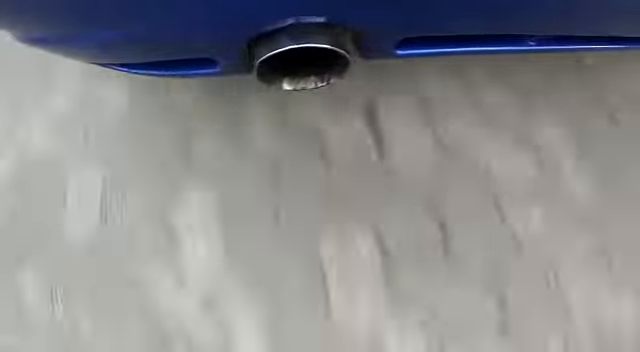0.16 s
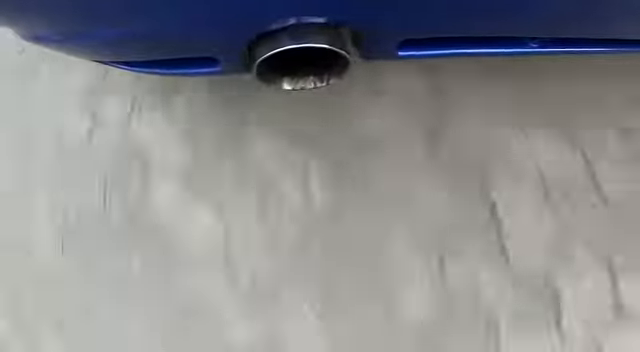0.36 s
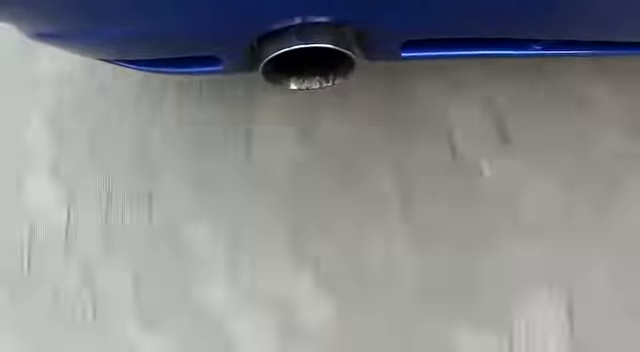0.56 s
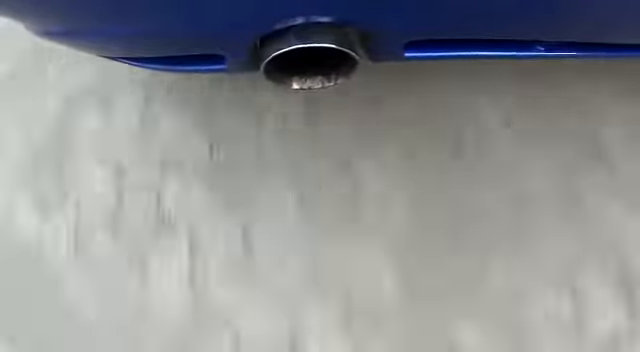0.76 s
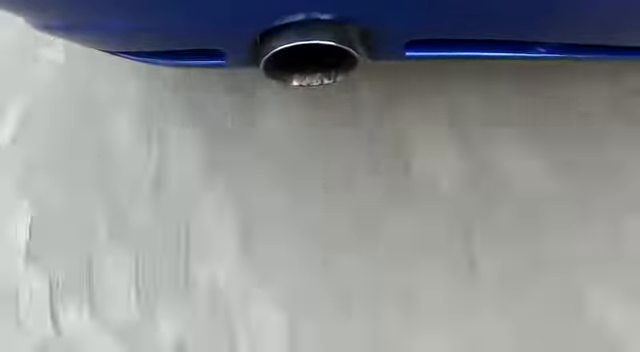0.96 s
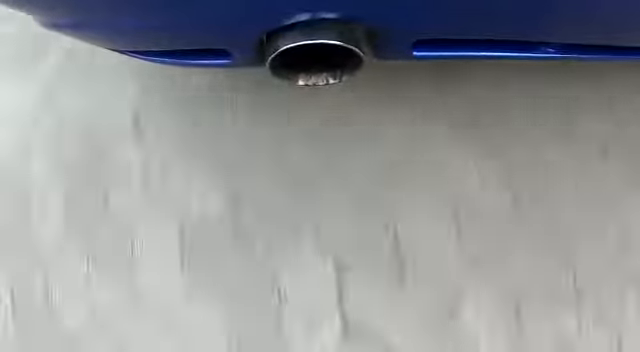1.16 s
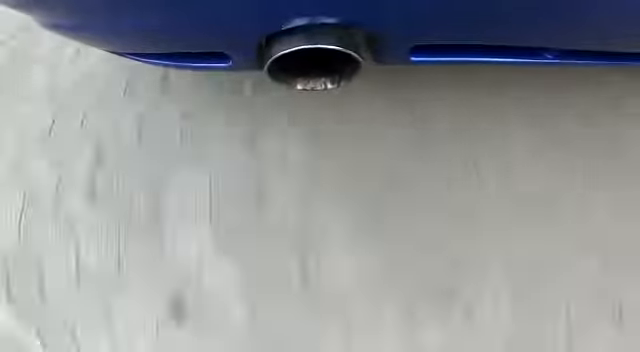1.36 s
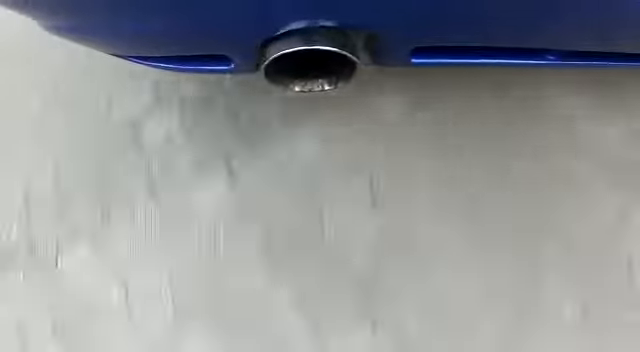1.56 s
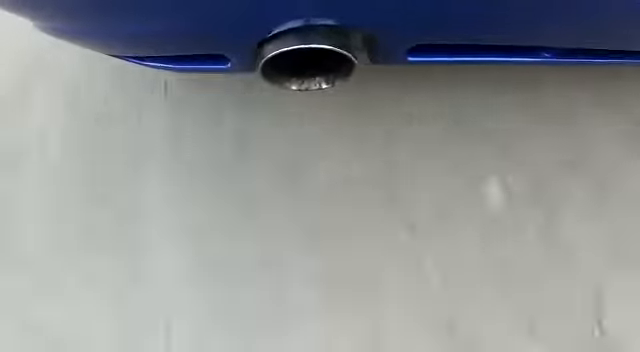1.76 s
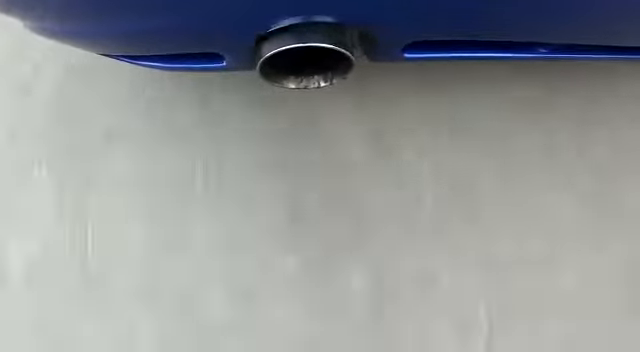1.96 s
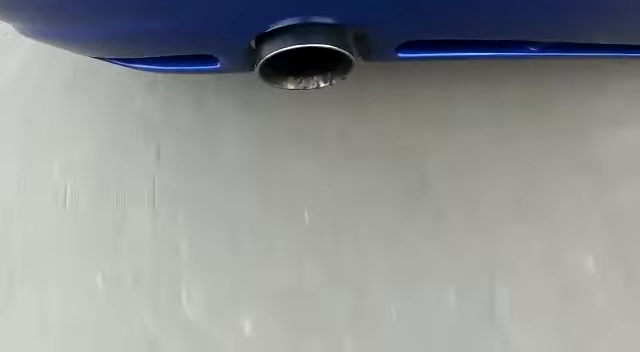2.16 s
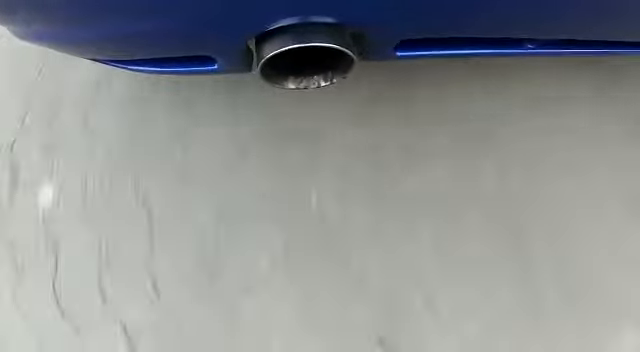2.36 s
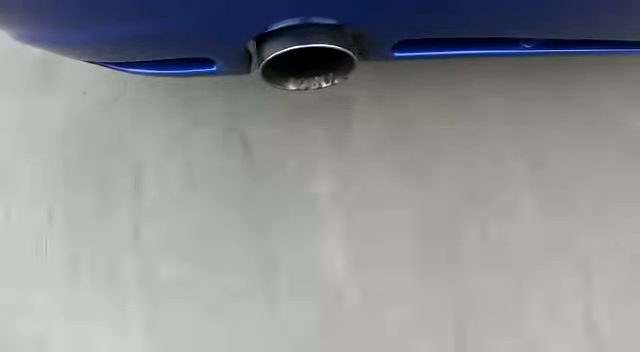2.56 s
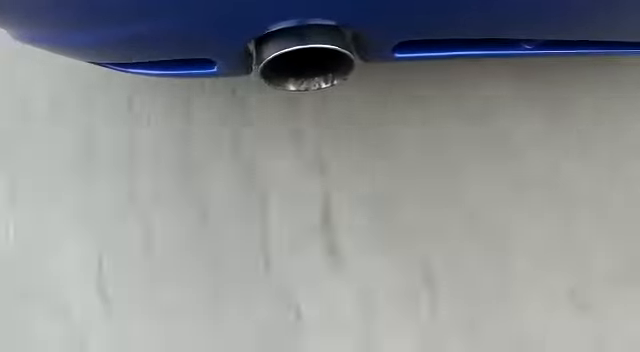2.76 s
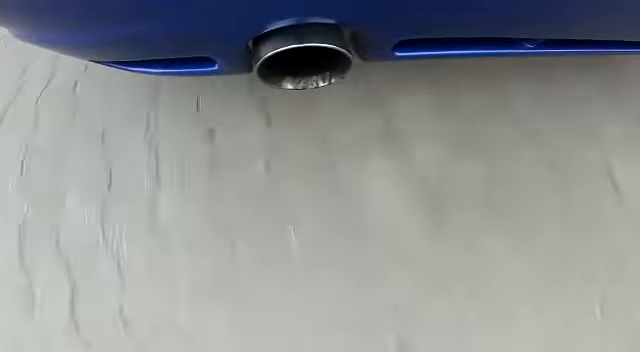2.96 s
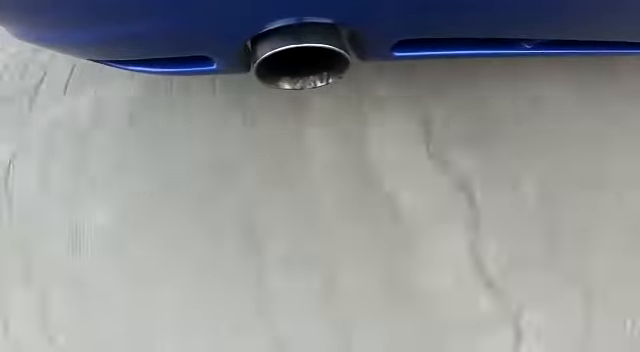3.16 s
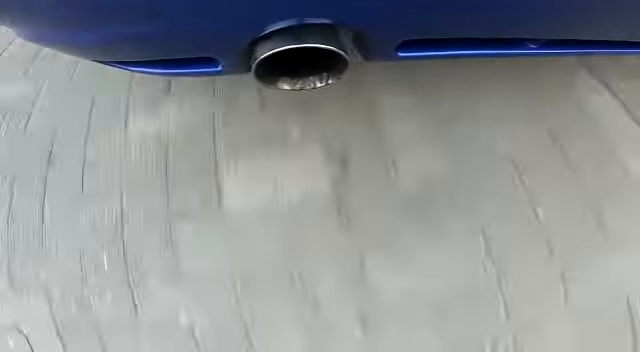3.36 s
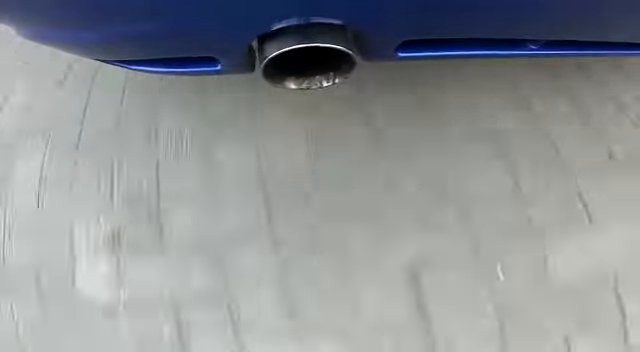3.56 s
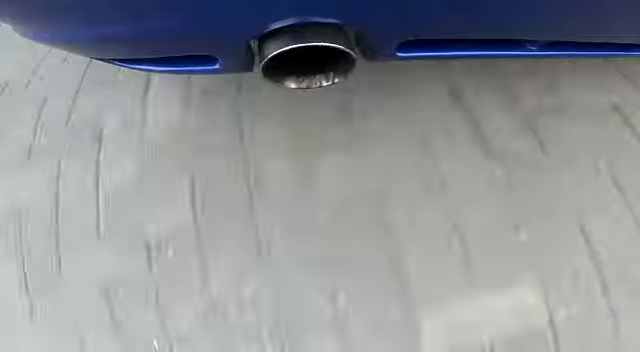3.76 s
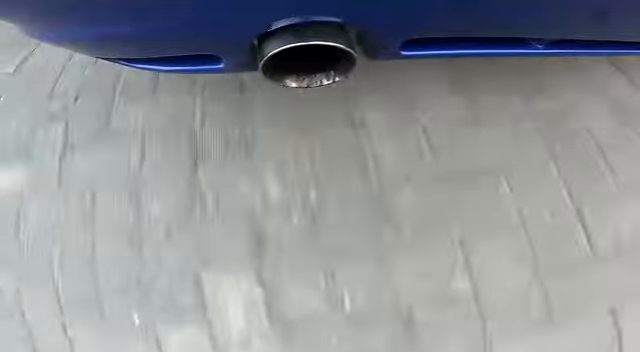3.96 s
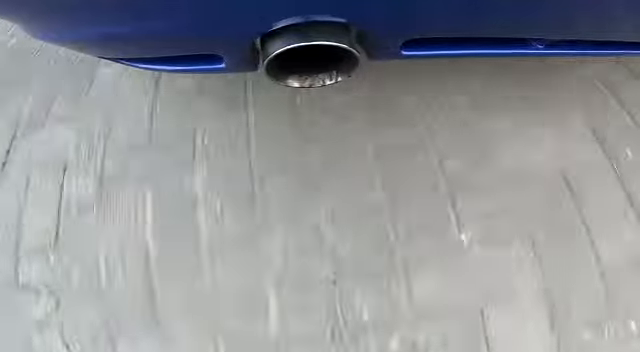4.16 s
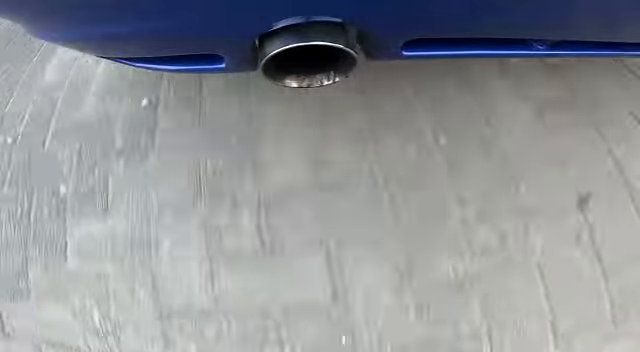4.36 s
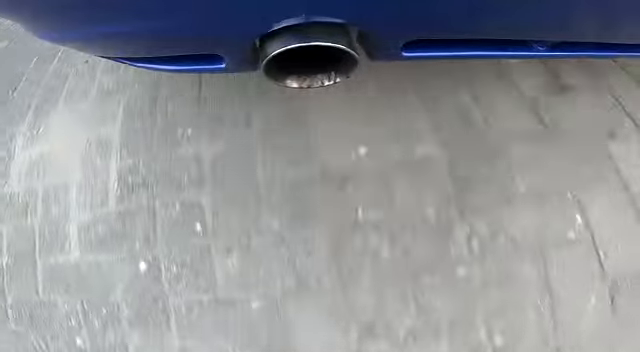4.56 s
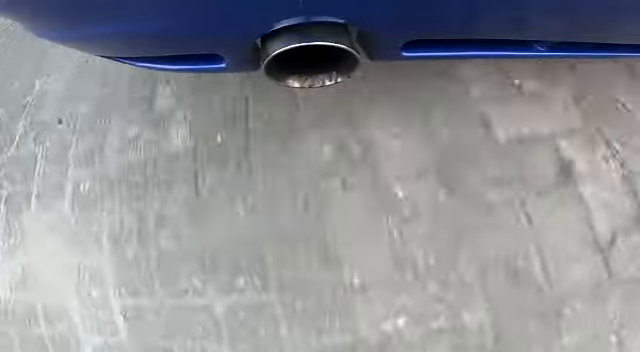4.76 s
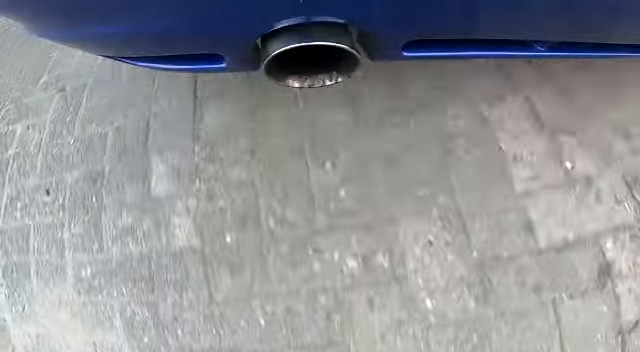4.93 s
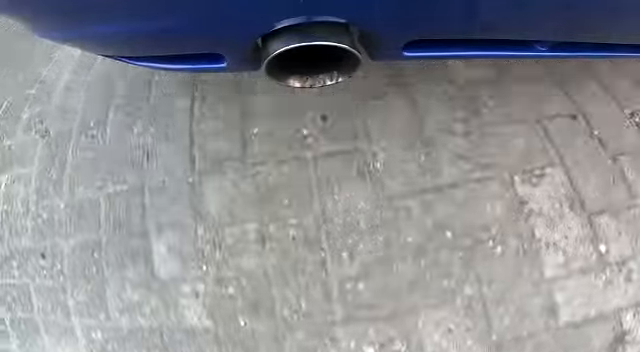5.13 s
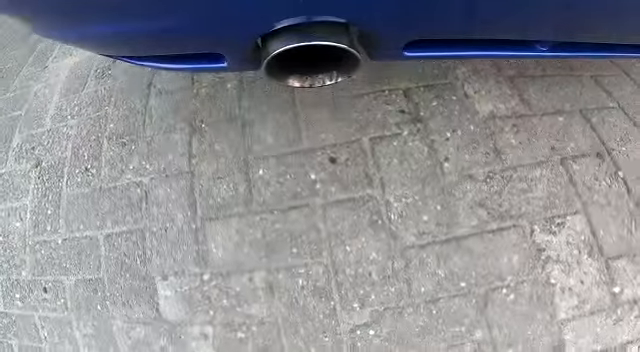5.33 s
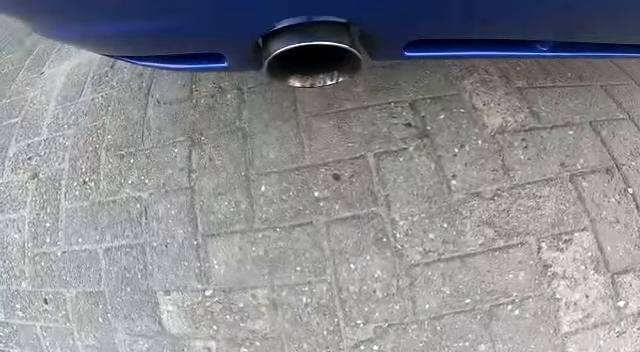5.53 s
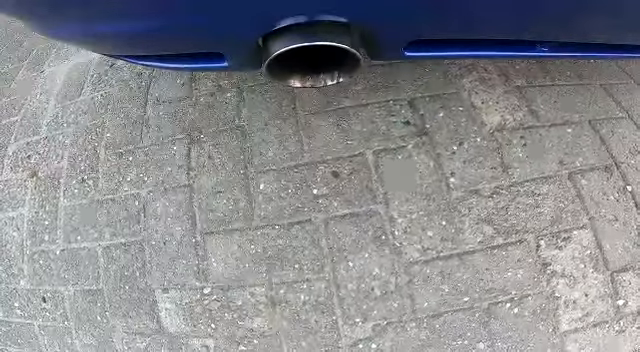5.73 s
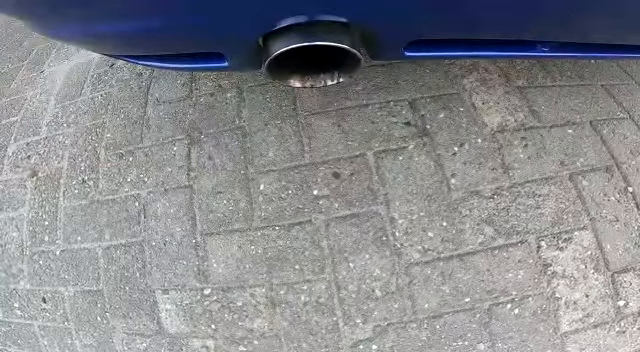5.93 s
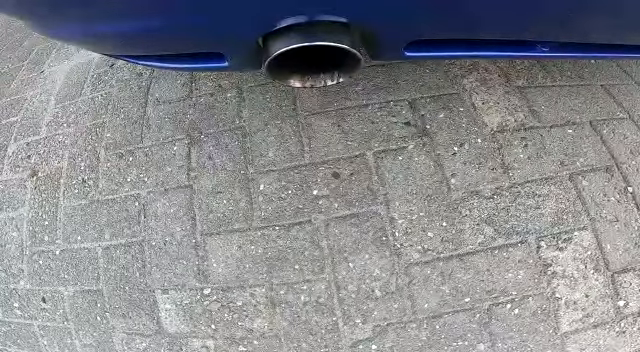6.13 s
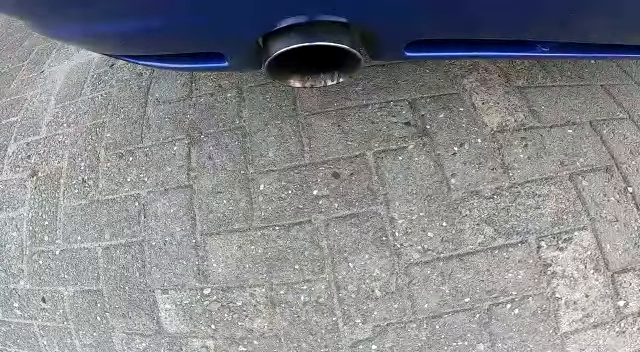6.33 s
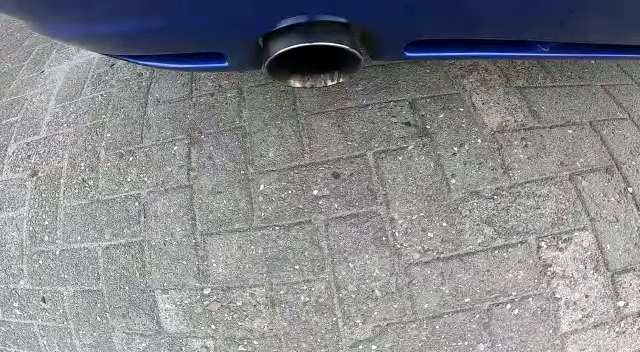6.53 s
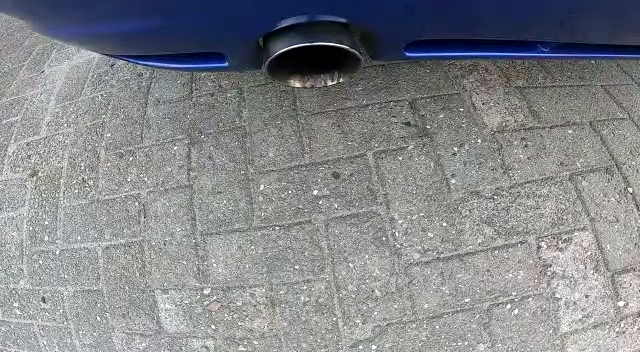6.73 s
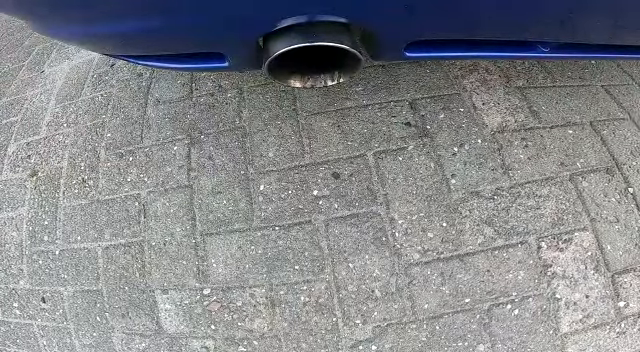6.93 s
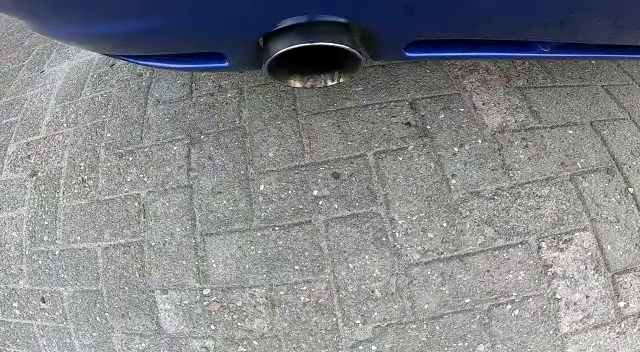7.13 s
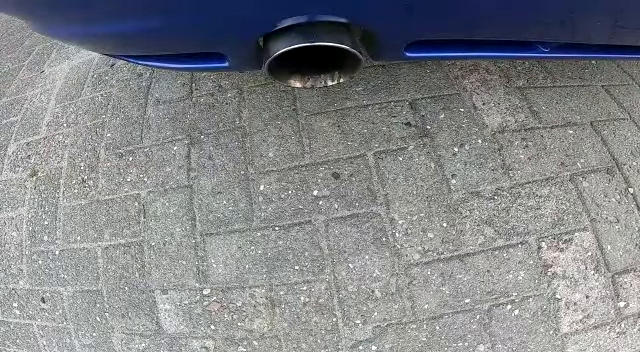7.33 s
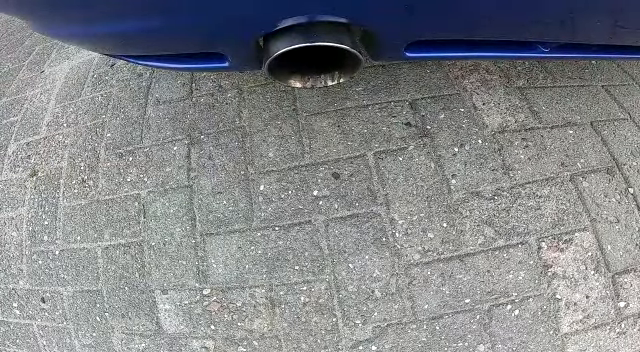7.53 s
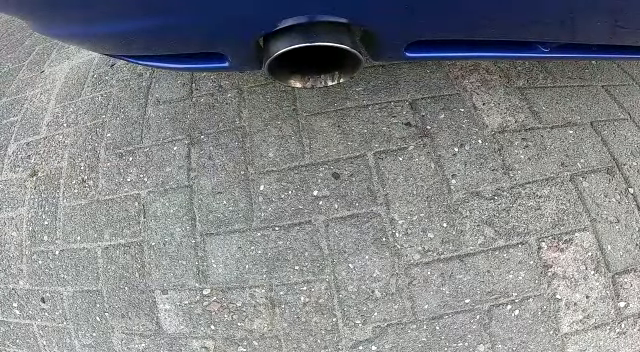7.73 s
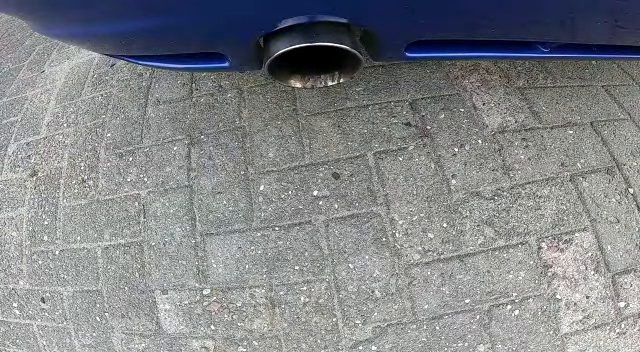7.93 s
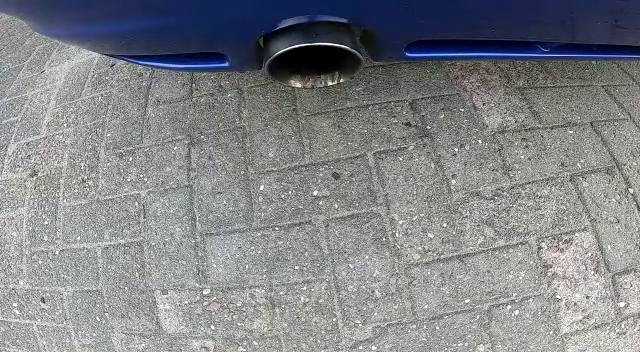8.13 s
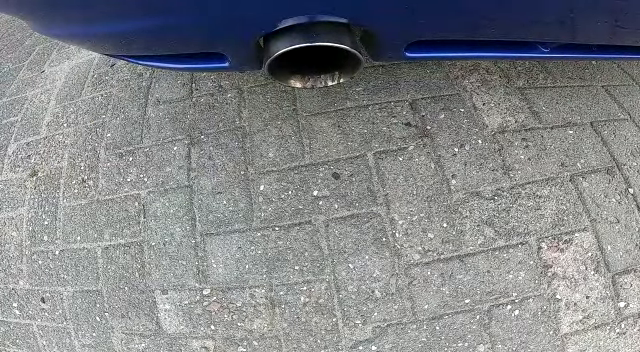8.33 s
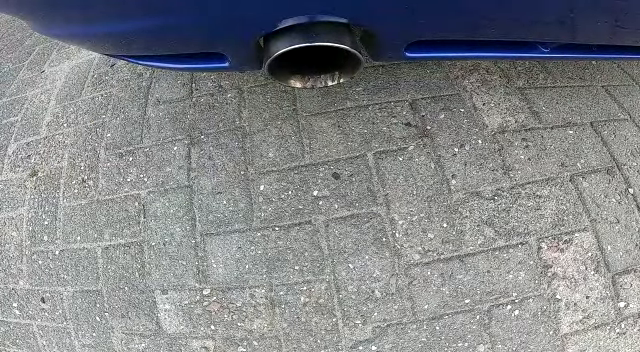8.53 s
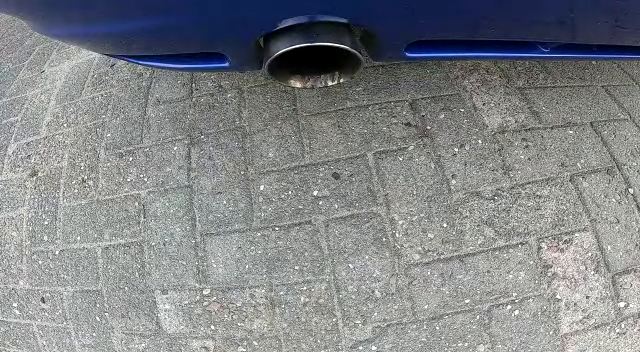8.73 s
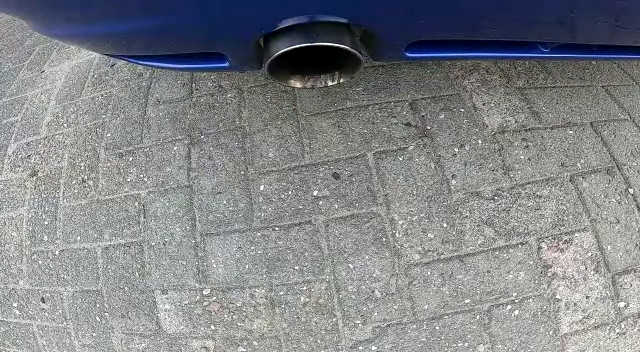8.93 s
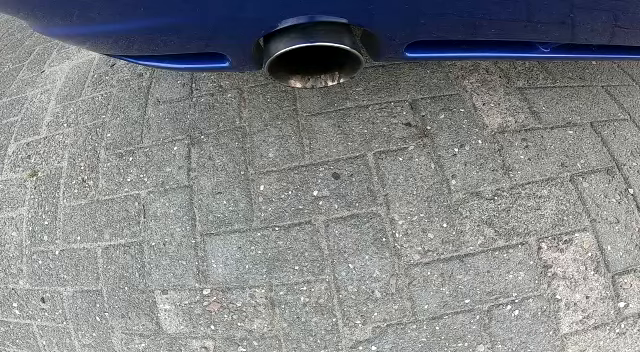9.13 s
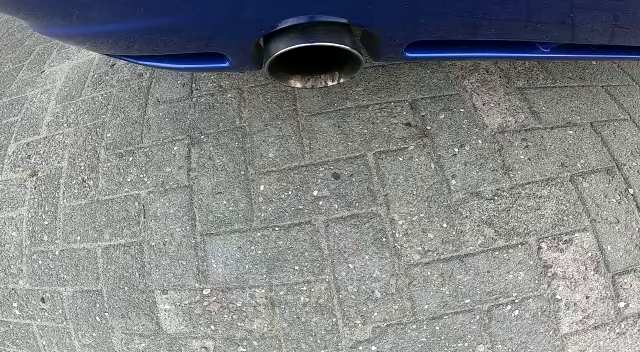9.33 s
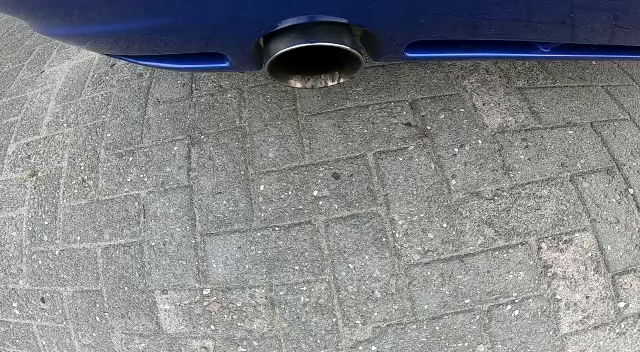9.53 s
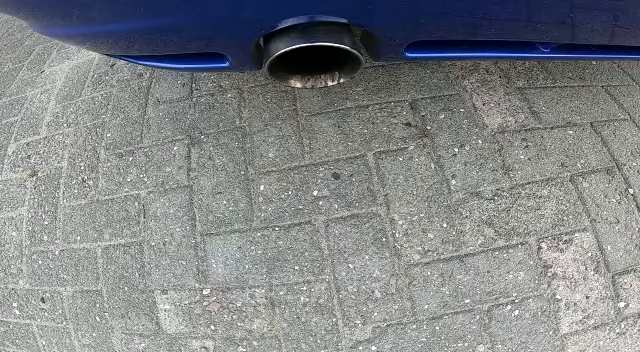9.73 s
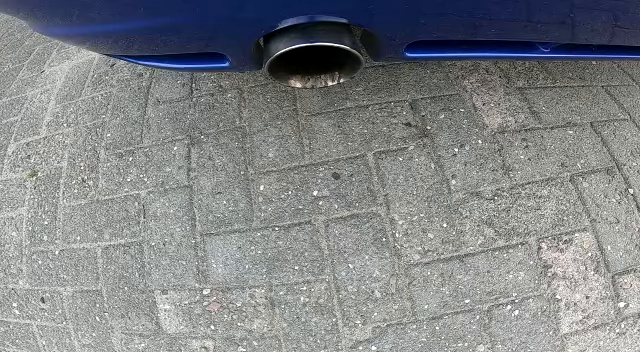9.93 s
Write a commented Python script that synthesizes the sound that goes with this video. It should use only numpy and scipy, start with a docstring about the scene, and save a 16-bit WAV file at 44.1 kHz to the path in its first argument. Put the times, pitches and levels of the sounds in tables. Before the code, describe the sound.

A deep, throbbing car exhaust sounds very close, dipping and swelling once as the car cruises over paving bricks, its tyres hissing faintly. The engine burbles down in pitch, then idles with an uneven, chuffing beat while trim ticks quietly. Finally the ignition is cut: the last strokes puff out and the engine rocks to a stop with a few dull knocks.

```python
"""A six-cylinder car's exhaust, heard just above the tailpipe: it cruises, coasts down, idles and is
switched off. Engine speed and throttle drive uneven firing pulses, which ring the silencer and pipe
and make the idle lope. Tyres hiss and snap grit on a brick street, and loose trim ticks.
With the ignition off, the last strokes puff out and the engine rocks in its mounts."""
import sys
import numpy as np
from scipy import signal
from scipy.fft import rfft, irfft
from scipy.io import wavfile
from scipy.ndimage import uniform_filter1d, map_coordinates

SR = 44100
rng = np.random.default_rng(int(sys.argv[2]) if len(sys.argv) > 2 else 0)


def transcribe(u):
    """Save the signal u as a 16-bit wav file named by the first command-line argument.

    u: samples, shape (n,) or (channels, n), limited to [-1, 1]; the rate is SR.
    q: integer samples, one column per channel.
    """
    v = np.clip(np.atleast_2d(u).T, -1, 1)
    q = np.round(v * 32767).astype(np.int16)
    wavfile.write(sys.argv[1], SR, q)


N = 440559


def amp(db):
    """Decibels to gain."""
    return 10 ** (np.asarray(db) / 20)


def unit(x):
    """Scale to rms 1."""
    return x / np.sqrt(np.mean(x ** 2) + 1e-20)


def steady(x):
    """Hold the rms at 1 over about two idling engine cycles."""
    return x / np.sqrt(np.abs(uniform_filter1d(x ** 2, size=15200)) + 1e-14)


def curve(rows):
    """Interpolate (seconds, value) rows to one value per sample."""
    return np.interp(np.arange(N) / SR, *np.transpose(rows))


def swells(rows):
    """Sum of bell-shaped level changes in dB, one value per sample."""
    t = np.arange(N) / SR
    return sum(db * np.exp(-((t - s) / width_s) ** 2) for s, width_s, db in rows)


def wobble(knots_per_s):
    """A smooth random curve, rms about 1."""
    knots = rng.standard_normal(int(N * knots_per_s / SR) + 4)
    return map_coordinates(knots, [np.arange(N) * knots_per_s / SR])


def colour(x, points, size=16384):
    """Minimum-phase filter with the gain of the (Hz, dB) points."""
    hz, db = np.transpose(points)
    gain = amp(np.interp(np.log(np.fft.rfftfreq(size, 1 / SR) + 1), np.log(hz), db))
    cepstrum = irfft(np.log(gain + 1e-6))
    cepstrum[1:size // 2] *= 2
    cepstrum[size // 2 + 1:] = 0
    return signal.fftconvolve(x, irfft(np.exp(rfft(cepstrum))))[:len(x)]


def butter(x, hz, kind, order=2):
    """Causal low- or high-pass."""
    return signal.sosfilt(signal.butter(order, hz, kind, fs=SR, output="sos"), x)


def resonate(x, hz, q):
    """One resonant mode."""
    return signal.lfilter(*signal.iirpeak(hz, q, SR), x)


def add(track, s, sound):
    """Mix a sound in at time s."""
    room = track[round(s * SR):][:len(sound)]
    room += sound[:len(room)]


def pipe_echo(x, share, trip_s=0.02489):
    """A pulse runs back up the exhaust and returns, twice."""
    late = lambda v: np.pad(v, (round(trip_s * SR), 0))[:len(v)]
    return x + share * late(x + share * late(x))


# Cylinders in firing order. Each row: valve lag in crank degrees, then boom, growl, ring, chuff
# and boom change at full overrun, all in dB.
CYLINDERS = [(0, -1, -8, -2.5, 0, 0), (.3, -1, -4.5, -3, -2.3, -4), (5.5, 1, 0, -4, -8, 2),
             (6.5, 1, 2.5, 1.5, -14, -2), (7, .8, 2, .5, -7, 2), (.8, -1, -2.5, 1.5, -7.5, 0)]
LAG_DEG, CYL_BOOM_DB, CYL_GROWL_DB, CYL_RING_DB, CYL_CHUFF_DB, CYL_COAST_DB = np.transpose(CYLINDERS)
# Unequal header pipes, which fill in the half orders. Each entry: one cylinder's delay in seconds.
HEADER_DELAYS_S = [0.000043, .0013, 0.00015, 0.0021, 0.000053, 0.00091]

def pulses(firings, sizes_db, scatter_db, jitter_deg, header_share=0):
    """One pulse per whole count of firings, with its cylinder's lag, header delay and size."""
    n = np.arange(np.ceil(firings[0]), np.floor(firings[-1]))
    cylinder = n.astype(int) % len(CYLINDERS)
    chance = rng.standard_normal((len(n), 2))
    lag_deg = LAG_DEG[cylinder] + jitter_deg * chance[:, 0]
    at = np.interp(n + lag_deg / 120, firings, np.arange(N))  # 120 crank degrees per firing
    at += np.broadcast_to(header_share, N)[at.astype(int)] * SR * np.array(HEADER_DELAYS_S)[cylinder]
    sizes = amp(sizes_db[cylinder] + scatter_db * chance[:, 1])
    return np.bincount(np.round(at).astype(int), sizes, N)[:N]


def turbulence(firings, decay_firings=1):
    """Gas noise that dies away after each valve opening."""
    return unit(np.exp(-(firings % 1) / decay_firings) * rng.standard_normal(N))


# Silencer resonances. Each row: frequency in Hz, gain in dB.
SILENCER_SPECTRUM = [(45, -80.5), (70, 9), (90, -3.5), (110, 12), (135, 13), (160, 0), (180, 4), (205, -12),
                     (255, -13.5), (400, -48.5), (800, -92.5)]

def silencer_boom(firings, speed, overrun):
    """The pulses' overtones ring the silencer; three strong cylinders make it lope at low speed."""
    train = pulses(firings, CYL_BOOM_DB, scatter_db=.35, jitter_deg=.35)
    train *= amp(overrun * CYL_COAST_DB[np.round(firings).astype(int) % len(CYLINDERS)])
    phasor = np.exp(2j * np.pi * firings)
    smooth = lambda v: uniform_filter1d(uniform_filter1d(v, size=4400), size=3800)
    fundamental = 2 * np.real(smooth(train / phasor) * phasor)
    overtones = unit(train - smooth(train) - fundamental)
    uneven = unit(pulses(firings, 5 * CYL_BOOM_DB, scatter_db=.6, jitter_deg=.4))
    lope = .4 * (1 - speed) ** 3 * resonate(uneven, hz=133, q=5)
    pressure = overtones + lope + .06 * turbulence(firings)
    boom = colour(pipe_echo(pressure, share=.2), SILENCER_SPECTRUM)
    boom -= .75 * speed ** 2 * resonate(boom, hz=112, q=4)  # dip smooths the throb at high engine speed
    thinned = butter(boom, hz=148, kind="high")
    return steady(boom + overrun * (thinned - boom))


# Exhaust fundamental. Each row: time in seconds, level in dB.
NOTE_LEVEL_DB = [(0, -19.5), (.75, -18.5), (.97, -34), (1.7, -34), (2.3, -37), (3.2, -40), (3.85, -43),
                 (4.08, -24), (4.26, -28.5), (5.2, -35.5), (8.8, -30.5)]

def lowest_note(firings):
    """A wavering sine at the firing rate, which swells and cancels with load."""
    tone = np.sqrt(2) * np.cos(2 * np.pi * (firings - .38))
    return tone * amp(curve(NOTE_LEVEL_DB) + .44 * wobble(3.2))


BURBLE_DEPTH_DB, BURBLES_PER_S = 1.7, 32
SURGE_LAG_FIRINGS = .3

def blowdown(firings, sizes_db, evenness):
    """The valve's crack, then the piston's surge; as the cylinders even out, chance burble grows."""
    swing = wobble(BURBLES_PER_S) + 1.5 * wobble(4 * BURBLES_PER_S)
    burble = amp(BURBLE_DEPTH_DB * evenness * swing)
    crack = pulses(firings, sizes_db, scatter_db=.9, jitter_deg=.6, header_share=1 - evenness)
    surge = pulses(firings - SURGE_LAG_FIRINGS, sizes_db, scatter_db=1.1, jitter_deg=1.3,
                   header_share=1 - evenness)
    levelling = amp(-evenness * sizes_db[np.floor(firings).astype(int) % len(CYLINDERS)])
    return burble * (levelling * (unit(crack) + .6 * unit(surge)) + .17 * turbulence(firings))


# Resonances at the pipe's mouth. Each row: frequency in Hz, gain in dB.
CHUFF_SPECTRUM = [(300, -25.5), (500, -5.5), (590, 4.5), (690, 10.5), (750, 4.5), (820, -6.5), (900, -3.5),
                  (1080, -5.5), (1190, -25.5), (1700, -32.5), (2500, -56.5), (6000, -66)]

def mouth_chuff(firings, speed):
    """Each chuff is a sharp pop and a short rush; faster gas is more turbulent."""
    pops = unit(pulses(firings, CYL_CHUFF_DB, scatter_db=1.1, jitter_deg=.8))
    rush = (.3 + 1.4 * speed) * turbulence(firings, decay_firings=.3 + .8 * speed)
    return steady(colour(pops + rush, CHUFF_SPECTRUM))


# Outflow noise. Each row: frequency in Hz, gain in dB.
FLOW_SPECTRUM = [(700, -25), (1150, 0), (1500, 3), (1780, -1), (2050, -16.5), (4000, -36)]
FLOW_IDLE_DB, FLOW_SPEED_DB = -74, 16.5

def gas_flow(firings, speed):
    """Gas rushes out of the pipe, louder with engine speed."""
    rush = unit(colour(turbulence(firings), FLOW_SPECTRUM))
    return rush * amp(FLOW_IDLE_DB + FLOW_SPEED_DB * speed ** 2)


# Throttle, lifted twice before the idle catches. Each row: time in seconds, drive in dB.
THROTTLE_DB = [(0.05, -26.5), (0.76, -23.5), (0.85, -20.5), (1.0, -25), (1.14, -35), (1.31, -31.5),
               (1.45, -17.5), (1.58, -21.5), (2.58, -26.5), (2.94, -24), (2.97, -24.5), (3.83, -25.5),
               (3.885, -38.5), (4.21, -48.5), (4.28, -34), (4.38, -29), (4.75, -30)]
# Engine stumbles. Each row: centre in seconds, half-width in seconds, drive change in dB.
STUMBLES = [(3.0, 0.024, -11.5), (5.91, 0.055, -5), (8.35, 0.035, -8.5)]
# The silencer booms least between two overtones. Each row: firing rate in Hz, gain in dB.
BOOM_BY_RATE_DB = [(35, 3.5), (38, 1), (43, 1), (55, -9), (64, -2), (80, -2.5)]
# The hollow ring opens under load. Each row: time in seconds, level over the drive in dB.
RING_OVER_DRIVE_DB = [(.72, -7), (.86, -4), (1.0, 0.5), (1.2, -3.5), (2.4, -3), (2.9, 0), (3.3, -6),
                      (4.35, -2), (4.7, -9.5), (5.5, -6), (6.5, -3)]
# The pipe spits. Each row: centre in seconds, half-width in seconds, chuff boost in dB.
SPITS = [(.617, 0.0064, 7), (5.93, 0.047, 5.5)]
IDLE_FROM_S, IDLE_SAG_DB_PER_S, CHUFF_RISE_DB_PER_S = 4.14, 2, 3

def exhaust_levels(rate_hz, speed):
    """Boom, growl, ring and chuff in dB follow the throttle; the idle grows lighter and drier."""
    idling_s = np.maximum(np.arange(N) / SR - IDLE_FROM_S, 0)
    drive_db = curve(THROTTLE_DB) + swells(STUMBLES) - IDLE_SAG_DB_PER_S * idling_s
    boom_db = .59 * drive_db + np.interp(rate_hz, *np.transpose(BOOM_BY_RATE_DB))
    growl_db = -7 + .84 * drive_db
    ring_db = drive_db + curve(RING_OVER_DRIVE_DB)
    chuff_db = -29 + .91 * drive_db + 6 * speed + CHUFF_RISE_DB_PER_S * idling_s + swells(SPITS)
    return boom_db, growl_db, ring_db, chuff_db


# Engine speed. Each row: time in seconds, firing rate in Hz.
FIRING_RATE_HZ = [(0, 79.81), (.76, 72.89), (1.35, 72.78), (1.55, 66.79), (1.78, 71.14), (2.5, 67.66),
                  (2.9, 63.98), (3.28, 57.9), (3.65, 48.6), (4.22, 37.69), (4.9, 36.39), (6.0, 35.57),
                  (6.4, 34.6), (7.8, 34.91), (8.85, 34.81)]
# Overrun: the wheels turn the engine. Each row: time in seconds, share of the boom's bass lost.
OVERRUN = [(2.9, 0.2), (3.35, 0.86), (3.9, 0.4), (4.1, 0.24)]
# The pipe's low growl. Each row: frequency in Hz, gain in dB.
GROWL_SPECTRUM = [(120, -33), (190, -9.5), (215, -2.5), (238, 3.5), (280, 2), (315, -3), (360, -12),
                  (460, -36.5), (700, -67), (1500, -98.5)]
# The pipe's hollow ring. Each row: frequency in Hz, gain in dB.
RING_SPECTRUM = [(200, -37), (300, -19), (335, -4.5), (365, 5.5), (400, 7.5), (425, -3), (460, -20),
                 (520, -17), (700, -51), (1500, -85.5)]
GROWL_LAG_FIRINGS, RING_LAG_FIRINGS, MOUTH_LAG_FIRINGS = .25, .17, .27
FIRST_CYLINDER_S = 7.1346

def exhaust():
    """Firing pulses ring the silencer and the pipe and chuff at its mouth until the ignition is cut."""
    rate_hz = curve(FIRING_RATE_HZ)
    firings = np.cumsum(rate_hz) / SR
    firings -= firings[round(FIRST_CYLINDER_S * SR)]
    speed = (rate_hz - rate_hz.min()) / np.ptp(rate_hz)
    overrun = curve(OVERRUN)
    coasting = overrun - overrun.min()
    evenness = np.clip(.6 * speed + .75 * coasting, 0, 1)  # 1: all cylinders pull alike
    boom_db, growl_db, ring_db, chuff_db = exhaust_levels(rate_hz, speed)

    boom = amp(boom_db) * silencer_boom(firings, speed, overrun)
    note = lowest_note(firings)
    growl_pulses = blowdown(firings - GROWL_LAG_FIRINGS, CYL_GROWL_DB, evenness)
    growl = amp(growl_db) * steady(colour(growl_pulses, GROWL_SPECTRUM))
    ring_pulses = blowdown(firings - RING_LAG_FIRINGS, CYL_RING_DB, evenness)
    ring = amp(ring_db) * steady(colour(ring_pulses, RING_SPECTRUM))
    coast_burble = amp(2 * BURBLE_DEPTH_DB * coasting * wobble(BURBLES_PER_S))
    chuff = amp(chuff_db) * mouth_chuff(firings - MOUTH_LAG_FIRINGS, speed)
    flow = gas_flow(firings - MOUTH_LAG_FIRINGS, speed)
    ignition = curve([(8.85, 1), (8.868, 0)])
    return ignition * (note + coast_burble * boom + growl + ring + chuff + flow)


# Modes of the loose trim. Each row: frequency in Hz, bandwidth in Hz, gain in dB.
TRIM_MODES = [(2770, 40, -7), (3060, 32, -4.5), (3493, 58, -2.5), (4630, 36, -5), (4990, 51, -5),
              (5110, 37, -6.5), (5160, 61, -12), (6070, 100, -17.5)]

def trim_ring(x, scatter_db=0, stretch=1):
    """Noise rings the trim's modes; stretch scales their pitch."""
    return sum(amp(db + scatter_db * rng.standard_normal()) * resonate(x, stretch * hz, q=hz / width_hz)
               for hz, width_hz, db in TRIM_MODES)


# Hiss of rolling tyres, fading at idle, then a swell of air as the engine runs down.
# Each row: time in seconds, level in dB.
HISS_LEVEL_DB = [(0, -58.5), (1.15, -62.5), (1.65, -57), (3.2, -58), (3.5, -55.5), (4.3, -56), (5.0, -63.5),
                 (8.0, -70), (9.1, -64.5), (9.3, -76)]
# Gritty patches. Each row: centre in seconds, half-width in seconds, hiss boost in dB.
GRIT_PATCHES = [(.22, 0.11, 2.5), (1.72, 0.017, 4.5), (1.82, 0.018, 3.5), (1.94, 0.017, 4),
                (2.05, 0.018, 4), (2.63, 0.02, 4), (3.0, 0.011, 3), (3.44, 0.079, 6), (3.61, 0.015, 6),
                (3.7, 0.022, 6.5), (3.8, 0.021, 4), (4.08, 0.013, 3.5)]
# A wheel drops into a dip. Each row: centre in seconds, half-width in seconds, rumble boost in dB.
BUMPS = [(1.6, 0.079, 5), (2.61, 0.025, 11.5)]
# Hiss of tyres and of puffed air. Each row: frequency in Hz, gain in dB.
HISS_SPECTRUM = [(650, -19), (1100, -4), (1320, -6), (1770, -5), (1930, -8.5), (2210, -6.5), (3220, -11),
                 (3510, -9), (3950, -12.5), (4810, -12), (6710, -13), (7120, -15.5), (8450, -25),
                 (11000, -60), (18600, -120)]
# Body rumble. Each row: frequency in Hz, gain in dB.
RUMBLE_SPECTRUM = [(12, -18), (24, -14), (45, -11.5), (60, -5.5), (75, 6), (100, -7.5), (160, -18.5),
                   (300, -24), (500, -33.5), (720, -32.5), (1100, -44.5), (2000, -78.5)]
SWISH_DB, SWISHES_PER_S = .92, 18
RUMBLE_DB, STALL_S, RUMBLE_DECAY_DB_PER_S = -33, 9.28, 137

def hiss_and_rumble():
    """Tyres hiss on pavers, air swells at shutdown; trim chatters, the body rumbles until the stall."""
    level_db = curve(HISS_LEVEL_DB)
    hiss_db = level_db + swells(GRIT_PATCHES) + SWISH_DB * wobble(SWISHES_PER_S)
    grit = rng.standard_normal(N) * amp(1.6 * wobble(700))
    hiss = unit(colour(grit, HISS_SPECTRUM)) * amp(1.2 * wobble(25))
    chatter = unit(butter(trim_ring(grit), 7000, "low", order=10) * amp(6 * wobble(22)))
    rumble_db = RUMBLE_DB + .58 * (level_db - level_db.mean()) + swells(BUMPS)
    rumble_db -= RUMBLE_DECAY_DB_PER_S * np.maximum(np.arange(N) / SR - STALL_S, 0)
    rumble = unit(colour(rng.standard_normal(N), RUMBLE_SPECTRUM))
    return amp(hiss_db) * (hiss + amp(-20.5) * chatter) + amp(rumble_db) * rumble


# Street background. Each row: frequency in Hz, gain in dB.
STREET_SPECTRUM = [(24, -53.5), (40, -20), (102, -6.5), (166, -5.5), (300, -14.5), (377, -11), (451, -27.5),
                   (737, -15), (2000, -49), (2600, -80.5), (4400, -120)]

def street():
    """A faint, steady hum over fainter white hiss."""
    hum = unit(colour(rng.standard_normal(N), STREET_SPECTRUM))
    return amp(-69.5) * hum + amp(-104.5) * rng.standard_normal(N)


# Stones under the tyres. Each row: start in seconds, peak in dB.
STONES = [(.5, -61), (0.696, -43), (0.886, -46.5), (0.902, -38), (3.134, -57), (4.0767, -50),
          (4.898, -46.5), (5.075, -55.5), (5.2, -51)]
# A stone's snap. Each row: frequency in Hz, gain in dB.
SNAP_SPECTRUM = [(2000, -33), (4000, -14), (5500, 0.5), (7200, 1), (9000, -12.5), (13000, -41.5)]
SNAP_T60_S = .025

def grit_snaps():
    """Grit snaps under the tyres, dry and bright."""
    out, t = np.zeros(N), np.arange(SR // 12) / SR
    for s, db in STONES:
        burst = rng.standard_normal(len(t)) * amp(-60 * t / SNAP_T60_S)
        snap = colour(burst, SNAP_SPECTRUM)
        add(out, s, amp(db) * snap / np.abs(snap).max())
    return out


# Small rattles. Each row: start in seconds, peak in dB, gain at 2-3.5 kHz in dB, T60 in seconds.
TICKS = [(3.4395, -39, -2, 0.13), (4.833, -37.5, 2, 0.1), (5.598, -52, 3, 0.77), (5.73, -49.5, 2, .2),
         (5.94, -48, 3, 0.29), (6.36, -58.5, 3, 0.081), (6.603, -49, -2, 0.089), (6.6368, -50.5, -4, 0.33),
         (6.691, -41, 0, 0.13), (6.713, -38, 4, 0.14), (6.733, -39, 0.5, 0.15), (6.85, -56.5, 6.5, 0.21),
         (6.903, -59, -16, .08), (7.196, -49, -0.5, 0.15), (7.456, -52.5, -5, 0.16), (7.7, -52.5, 1, 0.18),
         (8.175, -51, -15, 0.14), (8.24, -50.5, 3, 0.13), (8.431, -57, -6, 0.13), (8.772, -45, 4.5, 0.055),
         (9.14, -41, 8, 0.043), (9.43, -55, -2, 0.19), (9.652, -55.5, -2, 0.24), (9.719, -48, -6.5, 0.1),
         (9.873, -57, -8, 0.25)]

def trim_ticks():
    """Brief scrapes ring the trim; faint ones are drier and come from parts with their own pitch."""
    out, t = np.zeros(N), np.arange(SR // 6) / SR
    for s, db, low_db, t60_s in TICKS:
        scrape = rng.standard_normal(len(t)) * amp(-60 * t / t60_s)
        faintness = np.clip((-37 - db) / 14, 0, 1)
        ring = trim_ring(scrape, scatter_db=2, stretch=1 + faintness * rng.uniform(-.12, .12))
        spectrum = [(700, -10), (2000, low_db), (3500, low_db), (5000, -2), (7000, -2),
                    (10000, -25), (14000, -45)]
        tick = colour(ring + (.1 + .2 * faintness) * scrape, spectrum)
        add(out, s, amp(db) * tick / np.abs(tick).max())
    return out


# Engine knocks against its mounts. Each row: start in seconds, level in dB.
KNOCKS = [(4.085, -37), (9.284, -50), (9.491, -38.5), (9.649, -44.5), (9.73, -54), (9.89, -51.5)]
# Mount resonances. Each row: frequency in Hz, gain in dB.
MOUNT_SPECTRUM = [(35, -58), (60, -2.5), (126, -2.5), (162, 10.5), (210, -1.5), (277, -2.5), (424, -11),
                  (493, -29), (531, -21.5), (1200, -79), (1560, -99), (2640, -120)]
KNOCK_RISE_S, KNOCK_T60_S = .00095, .44

def mount_knocks():
    """The engine rocks in its mounts with dull knocks, as the idle catches and as it stops."""
    out, t = np.zeros(N), np.arange(SR // 2) / SR
    attack = 1 - np.exp(-t / KNOCK_RISE_S)
    for s, db in KNOCKS:
        shake = unit(colour(rng.standard_normal(len(t)), MOUNT_SPECTRUM))
        add(out, s, shake * attack * amp(db - 60 * t / KNOCK_T60_S))
    return out


# Strokes after ignition off. Each row: start in seconds, puff level in dB, air hiss level in dB.
PUFFS = [(8.8712, -8, -57.5), (8.903, -9.5, -56), (8.941, -8.5, -62), (8.977, -6, -58), (9.02, -6, -53.5),
         (9.064, -8, -50), (9.119, -9.5, -45), (9.186, -12.5, -60), (9.2968, -21, -61.5)]
# Unfired air leaving the pipe. Each row: frequency in Hz, gain in dB.
PUFF_SPECTRUM = [(13, -37), (24, -4.5), (65, 6), (100, 5.5), (135, 12), (165, 0), (200, -19), (250, -2),
                 (300, -15.5), (370, -8), (450, -26), (700, -16), (1100, -22), (1800, -55), (3000, -83)]
FIRST_CUTOFF_HZ, CUTOFF_DECAY_S, AIR_T60_S = 280, .26, .055

def run_down():
    """Unfired cylinders pump ever slower, duller puffs; each shakes the trim and echoes inverted."""
    out, t = np.zeros(N), np.arange(SR // 4) / SR
    stroke = colour(signal.unit_impulse(len(t)), PUFF_SPECTRUM)
    for s, db, air_db in PUFFS:
        cutoff_hz = FIRST_CUTOFF_HZ * np.exp((PUFFS[0][0] - s) / CUTOFF_DECAY_S)
        puff = butter(stroke, cutoff_hz, "low")
        puff *= amp(db) / np.abs(puff).max()
        air = unit(colour(rng.standard_normal(len(t)), HISS_SPECTRUM)) * amp(air_db - 60 * t / AIR_T60_S)
        add(out, s, pipe_echo(puff + air + 2.8 * trim_ring(air), share=-.5, trip_s=.0205))
    return out


def scene():
    """The car and the street, in mono from above the tailpipe."""
    engine = exhaust() + run_down() + mount_knocks()
    return (engine + trim_ticks() + grit_snaps() + hiss_and_rumble() + street())[None]


def record(dry):
    """A steep low-pass removes the highest treble."""
    return butter(dry, hz=14400, kind="low", order=12)


dry = scene()
out = record(dry)
transcribe(out)
```